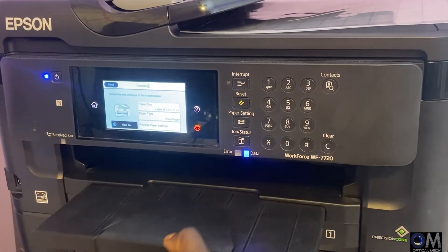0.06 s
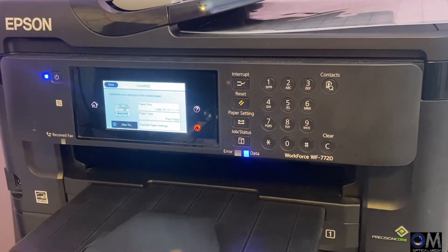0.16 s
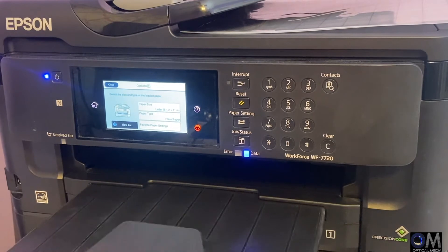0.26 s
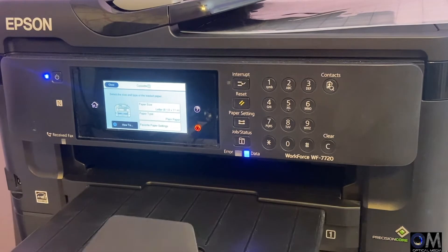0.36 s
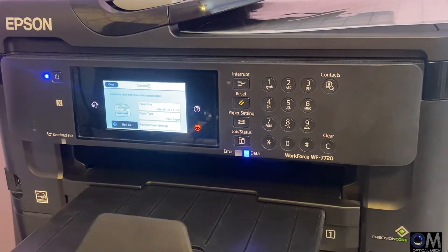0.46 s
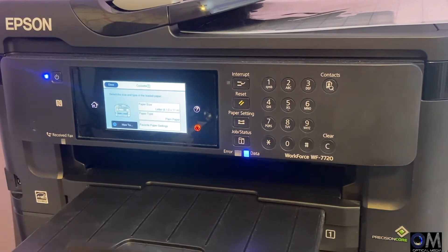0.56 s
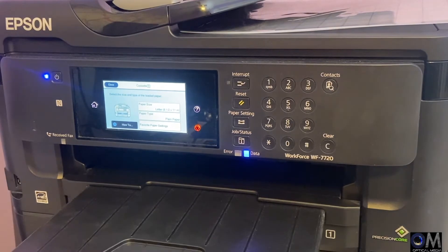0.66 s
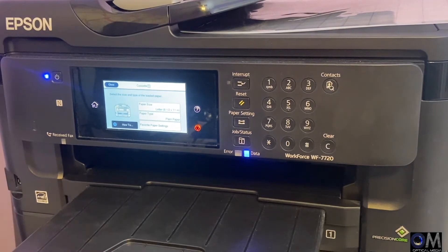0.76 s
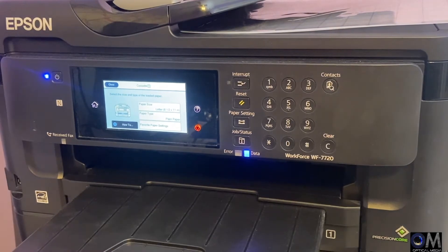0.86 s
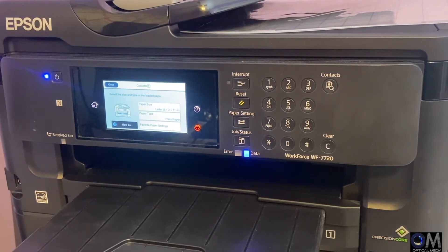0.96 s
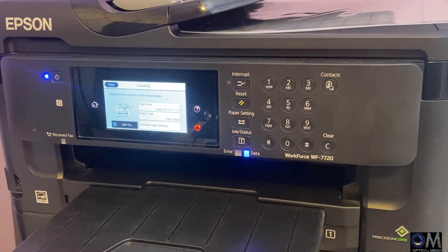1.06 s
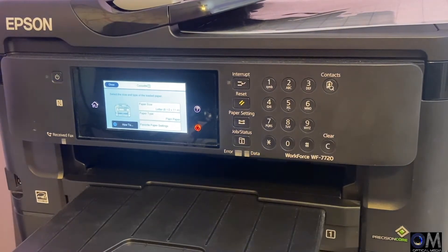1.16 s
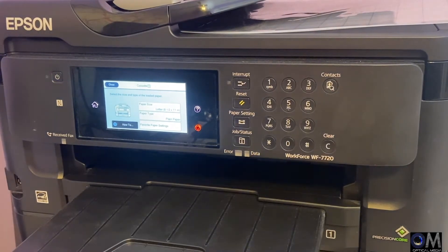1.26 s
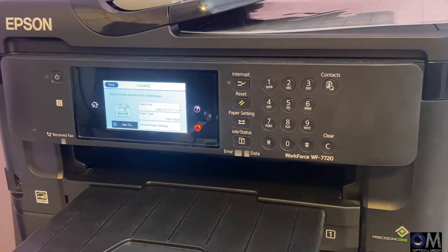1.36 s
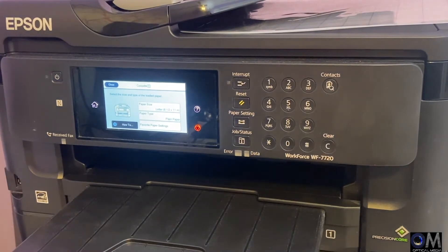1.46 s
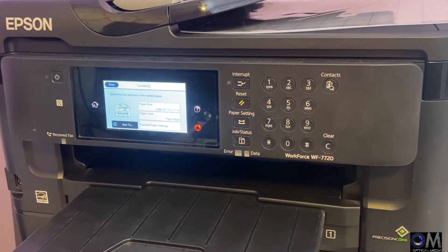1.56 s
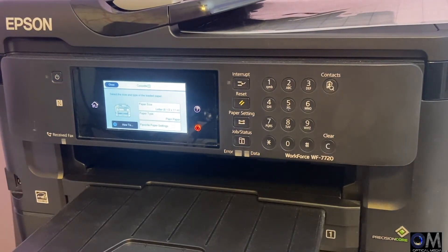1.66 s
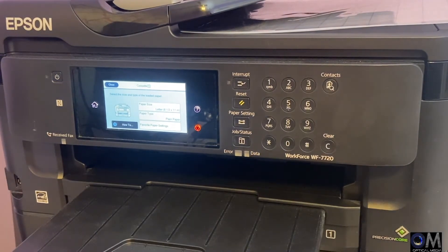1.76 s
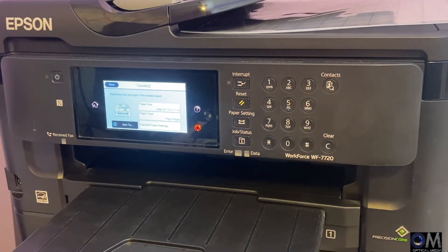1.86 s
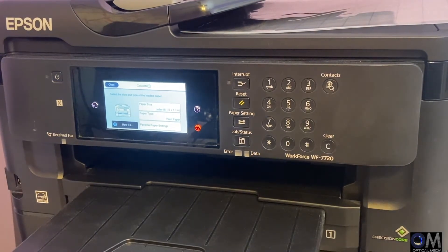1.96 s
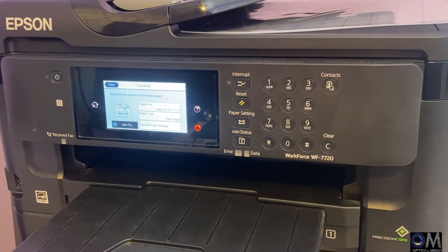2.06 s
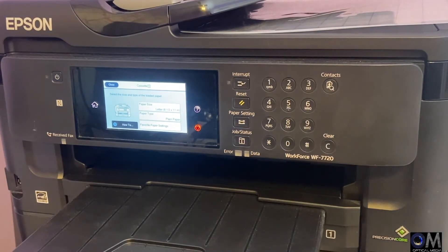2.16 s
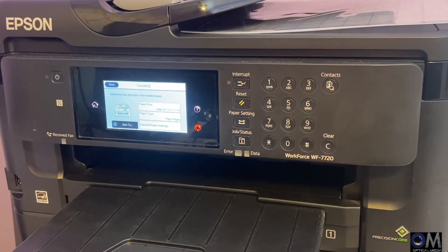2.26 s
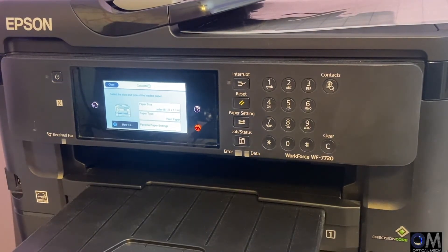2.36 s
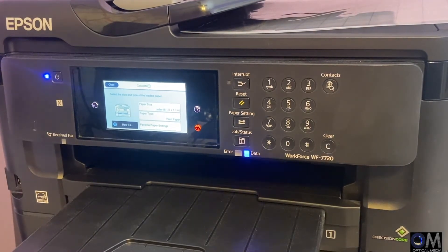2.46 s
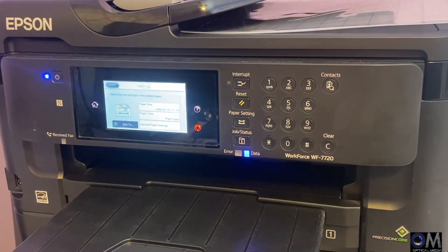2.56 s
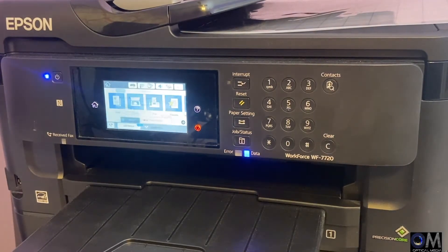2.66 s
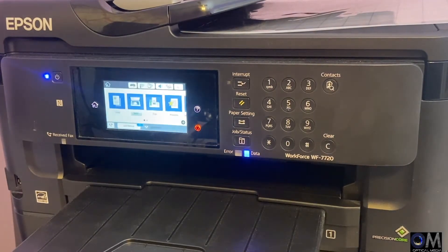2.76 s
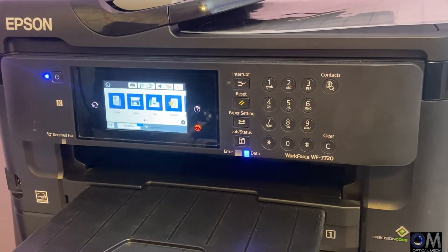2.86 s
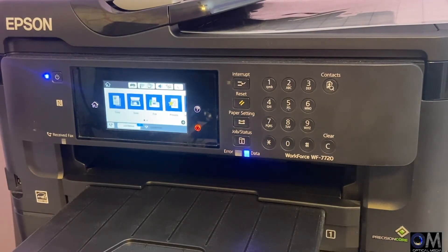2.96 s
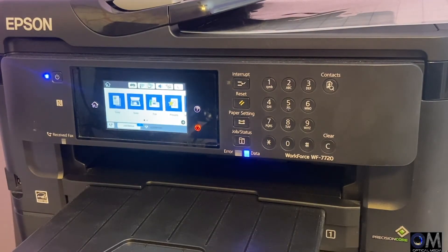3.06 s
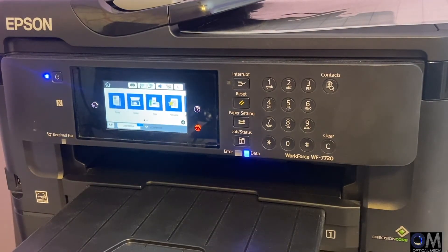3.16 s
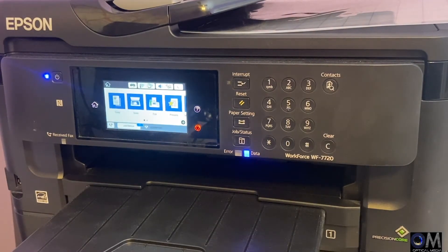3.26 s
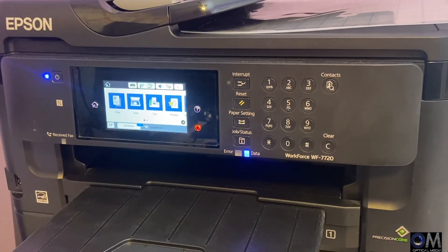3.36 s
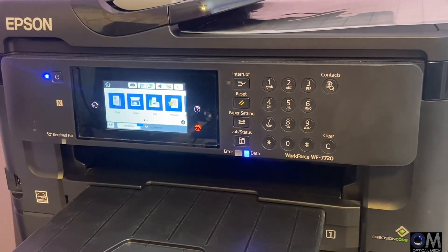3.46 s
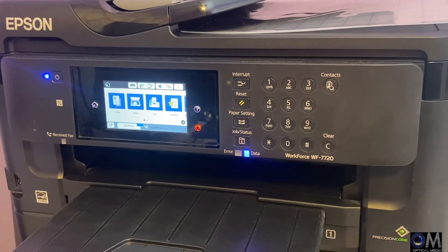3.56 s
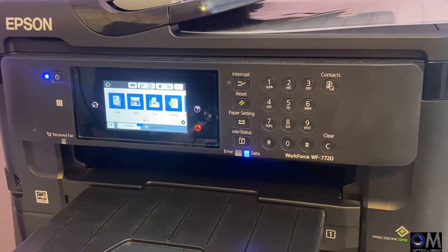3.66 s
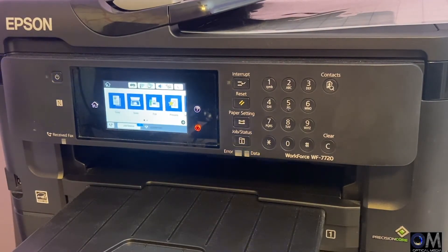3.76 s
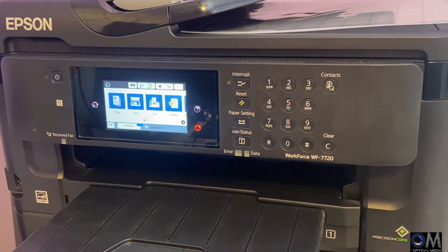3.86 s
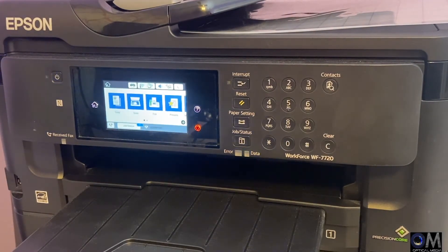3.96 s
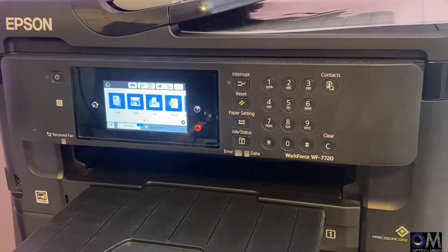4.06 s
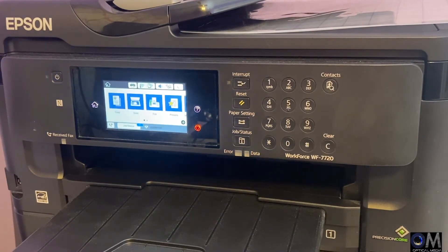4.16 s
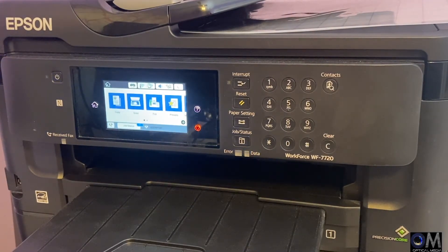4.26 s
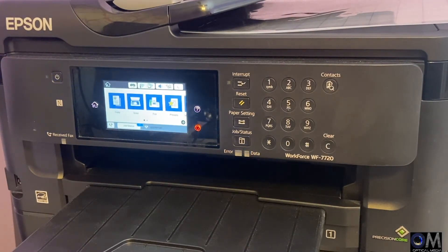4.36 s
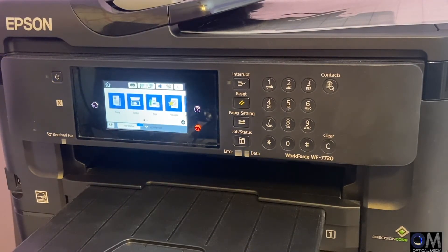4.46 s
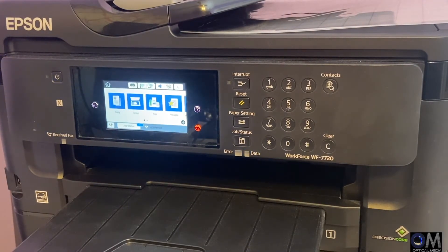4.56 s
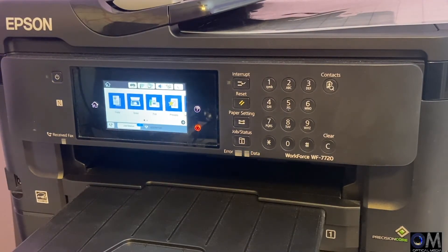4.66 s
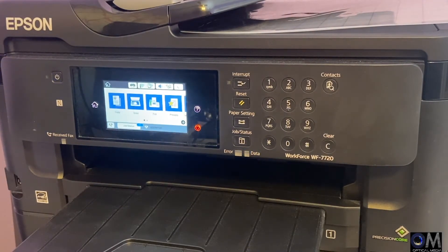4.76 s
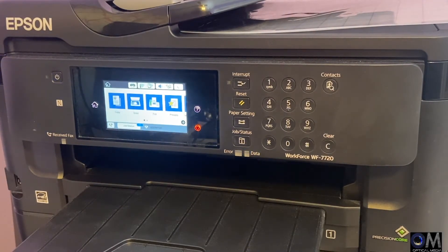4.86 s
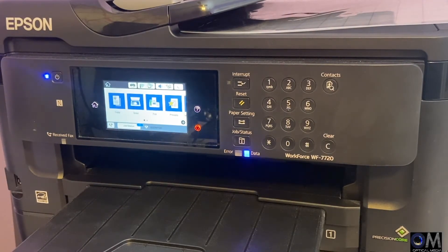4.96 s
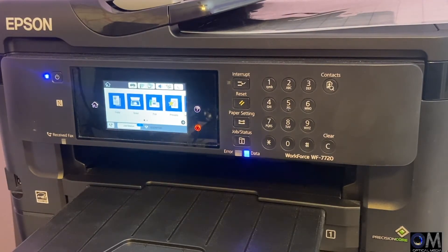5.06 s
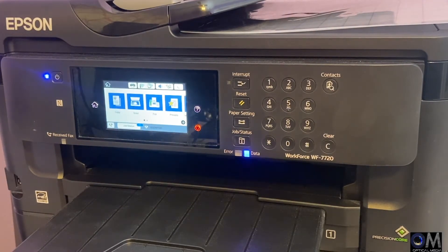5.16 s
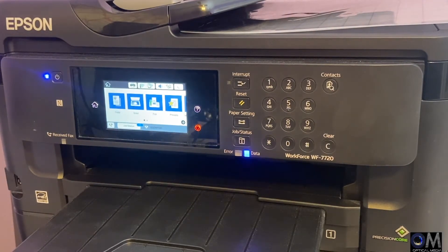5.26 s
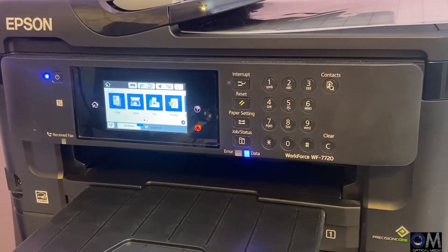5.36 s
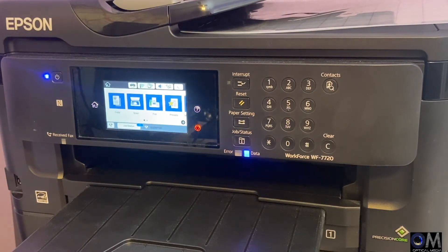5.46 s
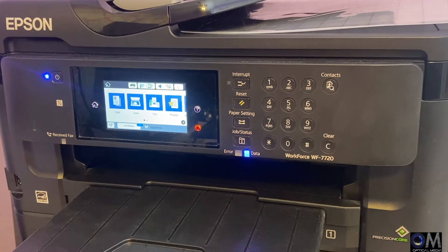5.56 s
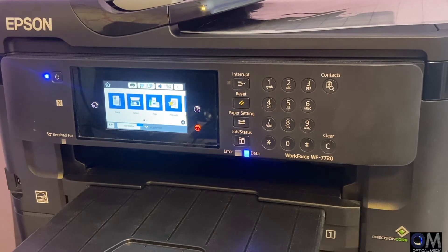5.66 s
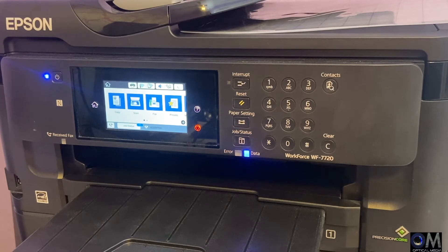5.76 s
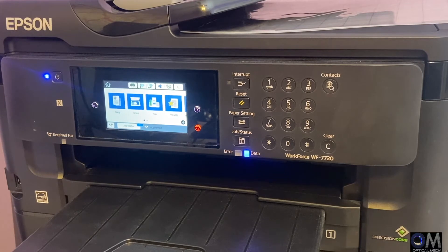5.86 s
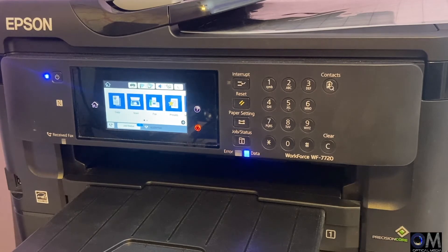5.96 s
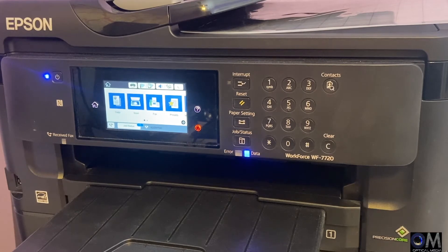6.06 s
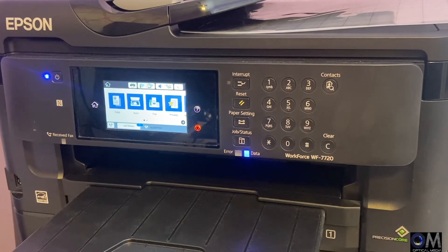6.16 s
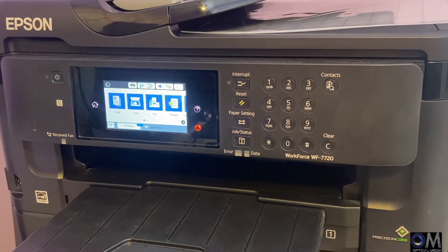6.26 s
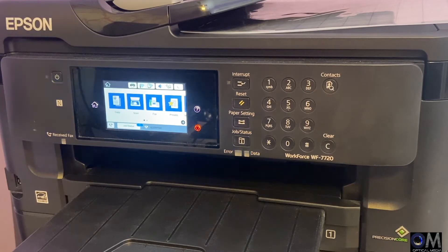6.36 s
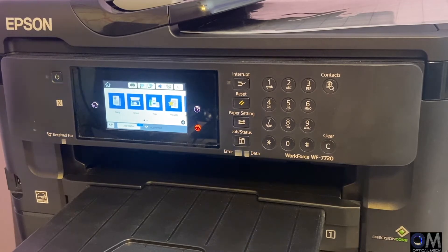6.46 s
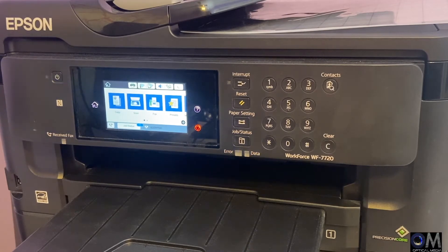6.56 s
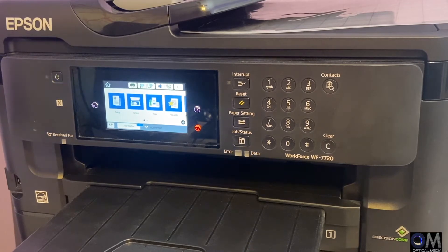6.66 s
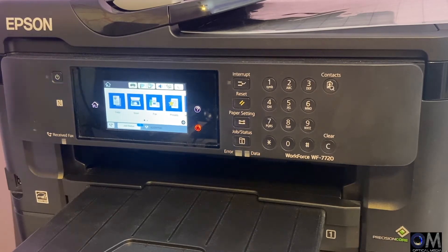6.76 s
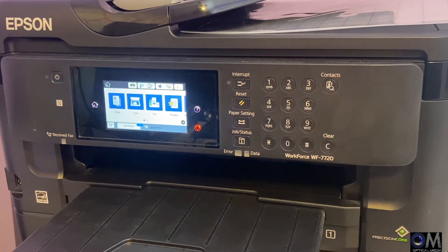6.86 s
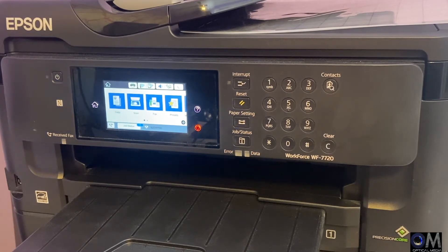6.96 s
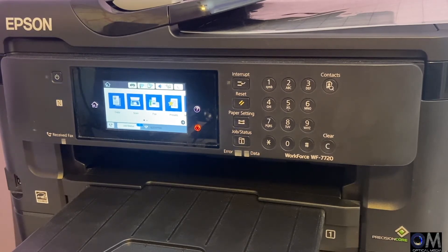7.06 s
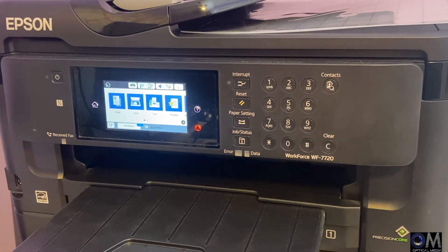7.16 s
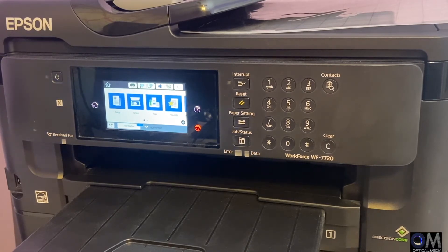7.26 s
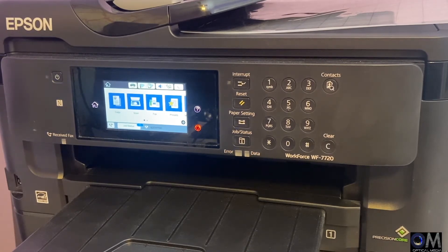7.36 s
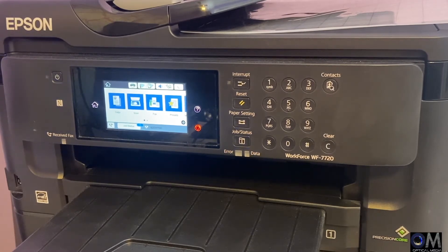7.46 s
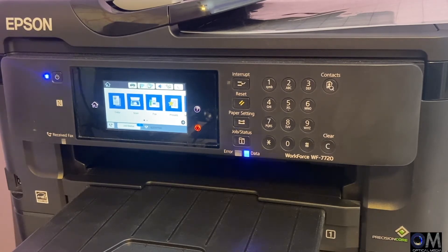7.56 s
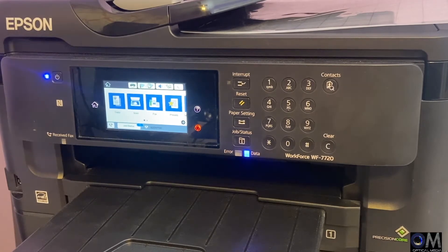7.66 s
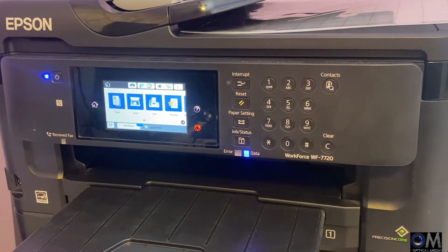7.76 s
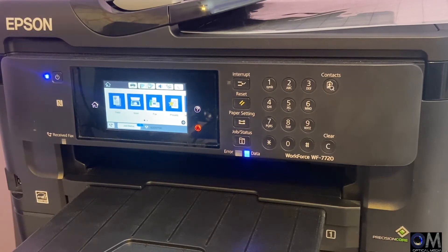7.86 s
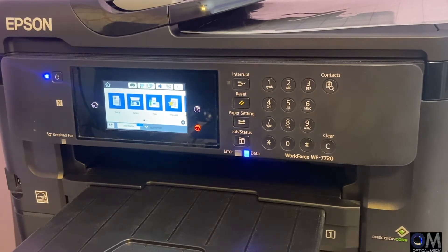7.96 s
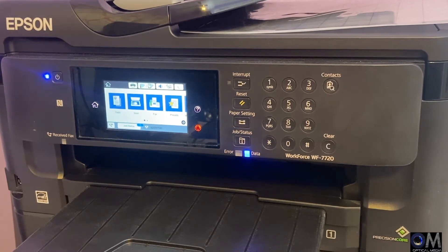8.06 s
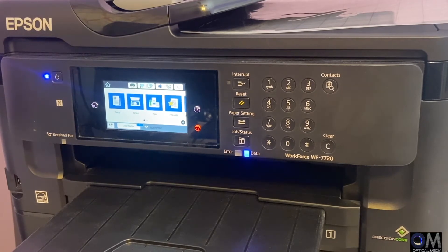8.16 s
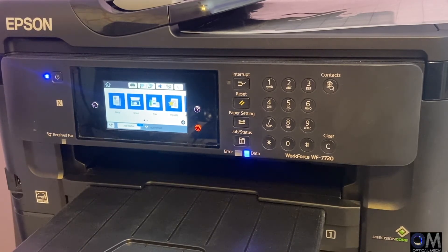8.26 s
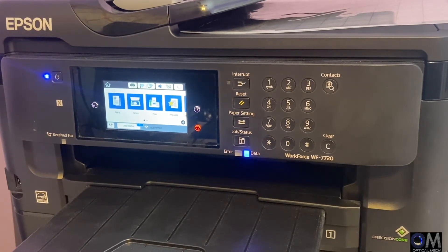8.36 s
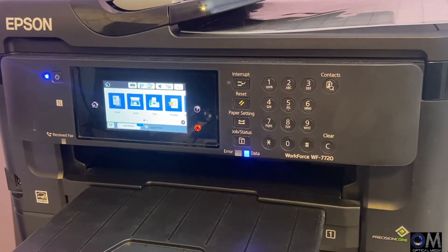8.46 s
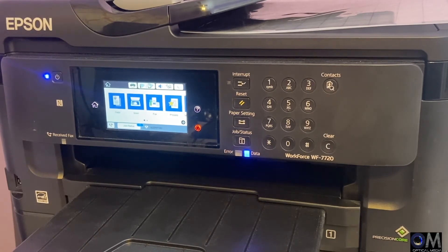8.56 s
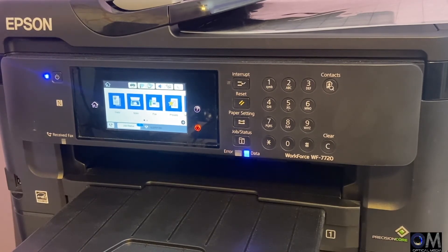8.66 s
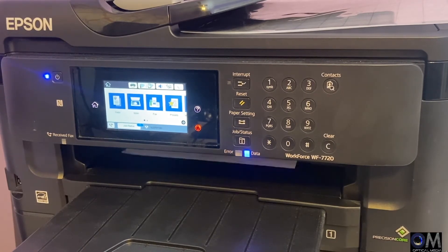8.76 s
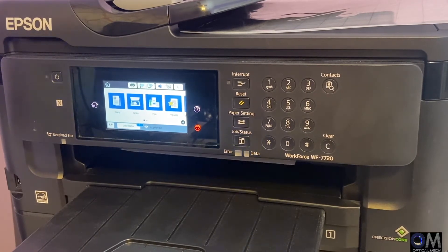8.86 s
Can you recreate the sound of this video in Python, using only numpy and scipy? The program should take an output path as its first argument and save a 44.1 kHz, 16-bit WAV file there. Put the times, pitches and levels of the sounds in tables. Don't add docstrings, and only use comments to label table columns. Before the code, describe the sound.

Plastic printer tray knocks, slides and bounces open, feed gears whir in bursts, a sheet clunks in, then the carriage shuttles rhythmically in a quiet room.

```python
import sys
import numpy as np
from scipy import signal
from scipy.fft import rfft, irfft
from scipy.io import wavfile

SR = 44100
rng = np.random.default_rng(int(sys.argv[2]) if len(sys.argv) > 2 else 0)


def attenuation_scalar(level_db):
    decades = np.asarray(level_db, float) / 20
    return 10 ** decades


def unload_audio(sound):
    columns = np.transpose(np.atleast_2d(sound))
    steps = np.round(np.clip(columns, -1, 1) * 32767)
    wavfile.write(sys.argv[1], SR, steps.astype(np.int16))


N = 393372
T = np.arange(N) / SR

CHASSIS_HZ = 131
# start_s, swish_db, chirp_db
STEPS = [(5.6638, -33.5, -45), (6.0177, -30.5, -42), (6.3417, -33, -50), (6.695, -30.5, -34),
         (7.016, -31, -36), (7.3494, -31.5, -33.5), (7.6839, -31, -36), (8.0157, -31.5, -37.5),
         (8.352, -31, -33.5), (8.682, -31.5, -36.5)]
# pitch_hz, density_db
SHAKE = [(25, -15), (60, -2), (130, -4), (200, -6.5), (320, -9.5), (600, -19), (1200, -48.5)]


def rms_one(x):
    return x / np.sqrt(np.mean(x ** 2) + 1e-20)


def at_hz(points, count):
    hz = np.maximum(np.arange(count // 2 + 1) * SR / count, 1)
    points = np.array(points)
    return np.interp(np.log(hz), np.log(points[:, 0]), points[:, 1])


def colour(x, spectrum):
    return rms_one(irfft(rfft(x) * attenuation_scalar(at_hz(spectrum, len(x))), len(x)))


def drift(rate):
    knots = rng.standard_normal(4000)
    return np.interp(T * rate, np.arange(len(knots)), knots)


def grit(rough_db, rate):
    return rng.standard_normal(N) * attenuation_scalar(rough_db * drift(rate))


def peak(x, hz, width):
    r = np.exp(-np.pi * width / SR)
    zeros = np.array([1, 0, -1]) * (1 - r * r) / 2
    poles = [1, -2 * r * np.cos(2 * np.pi * hz / SR), r * r]
    return signal.lfilter(zeros, poles, x)


def stack(hz, orders, flutter_db, wobble):
    turn = 2 * np.pi * np.cumsum(hz * (1 + wobble * drift(40))) / SR
    return sum(np.sqrt(2) * attenuation_scalar(db + flutter_db * drift(25)) * np.sin(k * turn) for k, db in orders)


def tones(lines, flutter_db):
    return sum(np.sqrt(2) * attenuation_scalar(db + flutter_db * drift(8.7)) * np.sin(2 * np.pi * hz * T) for hz, db in lines)


def stroke(start, stop, up, down):
    return -up * np.maximum(start - T, 0) - down * np.maximum(T - stop, 0)


def add(out, s, x):
    i = int(s * SR)
    out[i:i + len(x)] += x[:N - i]


def thump(db, rise_s, t60, shake, shake_db):
    t = T[:len(shake)]
    swing = (1 - np.exp(-t / rise_s)) * attenuation_scalar(-60 * t / t60)
    mode = np.sin(2 * np.pi * CHASSIS_HZ * t + rng.uniform(0, 6.8))
    return attenuation_scalar(db + 5.0) * swing * (mode + attenuation_scalar(shake_db) * shake)


def office():
    # pitch_hz, density_db
    air_spectrum = [(15, -22), (30, -4.5), (50, 12), (100, -2.5), (190, 1), (260, -11), (500, -14.5),
                    (680, -39.5), (3000, -46), (5000, -53), (8000, -57), (15800, -66.5)]
    # pitch_hz, level_db
    hum_lines = [(334.5, -62), (576, -77), (11800, -98), (12236, -98), (12651, -94), (13964, -94),
                 (15256, -96), (15692, -96)]
    flicker = attenuation_scalar(2.5 * drift(18))
    air = colour(rng.standard_normal(N), air_spectrum)
    return attenuation_scalar(-58.5) * flicker * air + tones(hum_lines, 2.0)


def gears():
    # pitch_hz, density_db
    rattle_spectrum = [(40, -23.5), (110, -7.5), (170, -8.5), (220, -12.5), (400, 2.5), (900, 0.5),
                       (1500, -3.5), (2200, -17), (3500, -44.5)]
    # pitch_hz, density_db
    hiss_spectrum = [(300, -32.5), (900, -4), (2000, 2.5), (3200, 0.5), (5000, -6), (8000, -7.5),
                     (11500, -8.5), (15800, -13)]
    # pitch_hz, width_hz, level_db
    gear_modes = [(172, 7.3, -9), (265, 89, -7.5), (418, 30, -11.5), (484, 20, -25.5), (830, 90, -13),
                  (1226, 12, -16)]
    # multiple, level_db
    whine_orders = [(1, 3), (3, -26)]
    # start_s, stop_s, rattle_db, whine_db
    feeds = [
        (2.99, 3.279, -38.5, -48.5),
        (3.367, 3.813, -39, -48.5),
        (4.541, 5.072, -37.5, -49),
        (5.114, 5.17, -40.5, -52),
        (5.238, 5.304, -36.5, -47.5),
    ]
    # start_s, stop_s, drone_db
    drone_runs = [(2.95, 3.137, -49), (3.24, 3.77, -40), (3.92, 4.056, -51.5), (4.72, 5.01, -40.5),
                  (5.11, 5.178, -39), (5.3, 5.396, -39)]
    # start_s, stop_s, rattle_db, hiss_db
    slides = [(-.02, -0.0176, -35.5, -48.5), (0.094, 0.0954, -45.5, -56.5), (0, 0.21, -50, -49),
              (.825, 0.98, -76.5, -69.5), (1.448, 1.4, -61, -88), (1.516, 1.53, -49, -85),
              (4.5, 4.5, -49, -52),
              (1.048, 1.066, -51, -58),
        (3.765, 3.83, -48, -45),
    ]
    # start_s, rattle_db, dying_db_per_s, drone_db
    creaks = [(0.241, -49.5, 34, -43), (.62, -75, 31, -52.5), (1.08, -64, 37, -56),
              (1.6, -77.5, 0.5, -69.5), (2.7, -69, 5, -61), (3.88, -66, 19, -51)]
    feed_up, feed_down = 910, 276
    whine_hz, whine_lag_s, whine_edge = 1605, 0.046, 1100

    teeth = grit(rough_db=0.5, rate=300)
    modes = sum(attenuation_scalar(db) * rms_one(peak(teeth, hz, width)) for hz, width, db in gear_modes)
    body = rms_one(colour(teeth, rattle_spectrum) + modes)
    hiss = attenuation_scalar(1.0) * colour(grit(rough_db=1.0, rate=180), hiss_spectrum)
    locked = stack(CHASSIS_HZ, [(0.99, 0.011)], flutter_db=-1.5, wobble=.03)
    drone = attenuation_scalar(-2.5) * rms_one(locked + 0.26 * rms_one(peak(teeth, CHASSIS_HZ, 30)))
    whine = stack(whine_hz, whine_orders, flutter_db=3.5, wobble=0.0019)

    rattles = hisses = whines = 0
    drones = sum(attenuation_scalar(db + stroke(start, stop, 290, 270)) for start, stop, db in drone_runs)
    for start, stop, db, whine_db in feeds:
        speed = stroke(start, stop, feed_up, feed_down)
        rattles += attenuation_scalar(db + speed)
        hisses += attenuation_scalar(db - 6 + 1.07 * speed)
        sing_from = min(start + whine_lag_s, stop)
        whines += attenuation_scalar(whine_db + stroke(sing_from, stop, whine_edge, whine_edge))
    for start, stop, db, hiss_db in slides:
        push = attenuation_scalar(stroke(start, stop, 350, 410))
        rattles += attenuation_scalar(db) * push
        hisses += attenuation_scalar(hiss_db) * push
        drones += attenuation_scalar(db - 11) * push
    for s, db, dying, drone_db in creaks:
        left = attenuation_scalar(stroke(s, s, feed_up, dying)) * (T < s + 1.2)
        rattles += attenuation_scalar(db) * left
        hisses += attenuation_scalar(db - 5) * left
        drones += attenuation_scalar(drone_db) * left
    return rattles * body + hisses * hiss + drones * drone + whines * whine


def idle():
    # start_s, stop_s, level_db
    squeaks = [
        (2.249, 2.367, -69),
    ]
    # start_s, stop_s, level_db
    sizzles = [
        (2.204, 2.69, -81.5),
        (3.98, 4.45, -83),
    ]
    # start_s, stop_s, level_db
    sings = [(0, 0.964, -73), (2.85, 2.951, -77), (3.95, 4.447, -75), (6.33, 6.45, -67)]
    edge = 500
    white = rng.standard_normal(N)
    squeak = rms_one(peak(white, 3520, 150) + peak(white, 3930, 110) + .6 * peak(white, 3250, 200))
    sizzle = rms_one(peak(peak(white, 7040, 700), 5900, 900))
    sing = tones([(12660, 0.0)], 3.0)
    return (squeak * sum(attenuation_scalar(db + stroke(start, stop, edge, 75)) for start, stop, db in squeaks)
            + sizzle * sum(attenuation_scalar(db + stroke(start, stop, edge, edge)) for start, stop, db in sizzles)
            + sing * sum(attenuation_scalar(db + stroke(start, stop, edge, edge)) for start, stop, db in sings))


def knocks():
    # pitch_hz, density_db
    knock_spectrum = [(100, -26), (400, -12.5), (700, 3), (1000, 3.5), (1800, -9), (3000, -16.5),
                      (6000, -52)]
    # pitch_hz, density_db
    case_spectrum = [(60, -18.5), (150, 3), (280, -5), (420, 1.5), (600, -4), (1000, -48.5)]
    # pitch_hz, density_db
    gear_spectrum = [(500, -43), (1500, -9), (2800, -1), (5000, -11.5), (8000, -13), (15800, -21)]
    # pitch_hz, density_db
    tray_spectrum = [(500, -30), (1500, -6), (3200, 0), (5000, -8.5), (8000, -12.5), (15800, -25.5)]
    # start_s, peak_db, ring_hz, crack_db, case_db
    tray_knocks = [(.237, -28, 3370, -19, -41), (.246, -12.5, 4870, -13.5, -27),
                   (.25, -10.5, 1180, -28, -37), (.262, -32, 1170, -24, -23.5),
                   (.285, -29.5, 885, -50, -39), (.347, -16, 3050, -30, -45),
                   (.363, -24, 4350, -45.5, -39.5), (.384, -30, 3550, -40, -55),
                   (.463, -24.5, 4060, -35, -42), (.474, -37, 3460, -48, -48),
                   (.492, -39, 3460, -45.5, -45), (.503, -28, 3460, -40, -40.5), (.52, -44, 3370, -41, -53),
                   (.6, -24, 900, -35, -35), (.604, -14, 910, -23.5, -27), (.62, -14, 880, -23.5, -38),
                   (.654, -36, 1000, -48, -40), (.661, -21.5, 1000, -35, -29.5),
                   (.677, -21.5, 3600, -25.5, -33.5), (.848, -46.5, 4390, -51, -47),
                   (.985, -31, 2350, -49, -39), (.988, -29, 790, -44.5, -31), (.989, -33, 2980, -57, -45),
                   (1.056, -34, 3300, -47, -39.5), (1.066, -26, 1000, -64, -40),
                   (1.072, -21, 990, -66, -47), (1.074, -34, 1480, -68, -53), (1.085, -40, 1095, -72, -52),
                   (1.414, -34.5, 664, -44.5, -72), (1.813, -46, 693, -84.5, -54.5)]
    # start_s, peak_db,
    # ring_hz, crack_db, case_db
    latches = [(2.193, -56.5, 660, -73, -58), (2.236, -57.5, 3550, -67, -53.5),
               (2.417, -51, 5490, -70, -72.5), (2.508, -60.5, 656, -65.5, -63.5),
               (2.615, -53, 1394, -64.5, -56.5), (2.694, -41, 900, -57, -44.5),
               (2.7, -28.5, 993, -44, -29.5), (2.706, -28.5, 850, -42, -48), (2.766, -32, 853, -75.5, -49),
               (2.899, -41, 2740, -43.5, -48), (2.905, -33, 2740, -38, -43),
               (2.915, -31.5, 960, -33.5, -51.5), (2.978, -26, 1044, -35, -61),
               (4.015, -33.5, 793, -83, -38), (4.029, -48, 3750, -54, -60), (4.073, -34.5, 1000, -81, -37),
               (4.179, -30, 870, -84, -37.5), (4.279, -43, 956, -64, -52), (4.369, -49, 1076, -58, -63),
               (4.415, -57, 1300, -78, -65), (4.451, -30, 953, -37.5, -36.5), (6.023, -48, 1000, -34, -49),
               (6.362, -36, 1000, -36.5, -51)]
    # start_s, peak_db, ring_hz, crack_db, case_db
    pickup = [(4.506, -24, 950, -28, -23.5), (4.525, -14, 1000, -48, -44), (4.533, -4, 2110, -41, -36),
              (4.779, -17, 1430, -22.5, -49), (4.868, -16, 1290, -26, -35), (4.994, -37, 875, -27, -58),
              (5.028, -25, 1610, -32, -49), (5.077, -15, 1200, -28.5, -43),
              (5.131, -20.5, 2200, -31.5, -38), (5.158, -24, 745, -40, -29), (5.211, -29, 1020, -32.5, -43)]
    # start_s, level_db, t60_s
    thumps = [(0.253, -36, 0.41), (0.618, -58, 0.22), (1.068, -29, 0.27), (1.17, -49, 0.42),
              (1.245, -52, 0.28), (2.706, -49.5, 0.63), (2.91, -42, 0.23), (3.901, -43.5, 0.32),
              (4.08, -49.5, 0.67), (4.291, -44, 0.25), (4.531, -23.5, 0.14), (5.079, -36, .2),
              (5.338, -33.5, 0.17)]

    out, t = np.zeros(N), T[:SR // 3]
    grains = grit(rough_db=-1.0, rate=660)
    rustle, case, shake = (colour(grains, c) for c in (knock_spectrum, case_spectrum, SHAKE))
    gear_crack, tray_crack = (colour(grains, c) for c in (gear_spectrum, tray_spectrum))
    families = ((tray_knocks, 0.084, 0.0012, tray_crack),
                (latches, .11, 0.0015, gear_crack),
                (pickup, 0.089, 0.0011, gear_crack))
    for rows, t60, rise, crack in families:
        snap = attenuation_scalar(2 - 60 * t / .018)
        decay = snap + attenuation_scalar(-3.0 - 60 * t / t60) + attenuation_scalar(-22.5 - 20 * t / t60)
        fade = decay * (1 - np.exp(-t / rise)) ** 2
        boom = attenuation_scalar(-40 * t / t60) * (1 - np.exp(-t / .005))
        for s, db, hz, crack_db, case_db in rows:
            i = int(s * SR)
            part = slice(i, i + len(t))
            width = 280 + .03 * hz
            ring = peak(grains[part] * fade, hz, width) / np.sqrt(width / SR) * (hz / 1500) ** .3
            add(out, s, attenuation_scalar(db - 16.5) * fade * rustle[part] + attenuation_scalar(db - 20.5) * ring)
            add(out, s, attenuation_scalar(crack_db - 5) * fade * crack[part])
            add(out, s, attenuation_scalar(case_db - 5.5) * boom * case[part])
    for s, db, t60 in thumps:
        add(out, s, thump(db, 0.017, t60, shake[int(s * SR):][:len(t)], shake_db=-8.0))
    return out


def tab():
    # pitch_hz, level_db, t60_s
    tab_modes = [(2315, -18, .08), (3030, -2, 0.079), (3182, -4.5, 0.13), (3400, -2.5, 0.13),
                 (3860, -3.5, 0.047), (3940, -9, 0.13), (4090, -8.5, .12), (4242, -6.5, 0.077),
                 (4620, -5, 0.041), (6500, -24, .1)]
    # start_s, level_db
    tab_hits = [(.347, -34), (.3625, -33), (.366, -38), (.385, -43), (.4637, -42.5), (.476, -43),
                (.492, -44), (.5036, -41), (.515, -47), (0.6036, -31.5), (.621, -44), (0.677, -39.5)]
    s, db = np.transpose(tab_hits)
    luck, out = rng.standard_normal((len(s), len(tab_modes))), np.zeros(N)
    for k, (hz, level_db, t60) in enumerate(tab_modes):
        clicks = np.full(SR, 1e-18)
        clicks[(s * SR).astype(int)] = attenuation_scalar(db + level_db + 3.5 * luck[:, k])
        r, w = attenuation_scalar(-60 / (t60 * SR)), 2 * np.pi * hz / SR
        add(out, 0, signal.lfilter([0, np.sin(w)], [1, -2 * r * np.cos(w), r * r], clicks))
    return out


def scrape():
    # start_s, pitch_hz, level_db
    glide = [
        (1.41, 812, -58),
        (1.45, 954, -45.5),
        (1.52, 1146, -48.5),
        (1.56, 1120, -56),
        (1.6, 1020, -67),
    ]
    s, hz, db = np.transpose(glide)
    inside = np.clip(np.minimum(T - s[0], s[-1] - T) / 0.017 + 1, 0, 1)
    flutter = signal.lfilter([1], [1, -.98], rng.standard_normal(N))
    tone = np.sin(2 * np.pi * np.cumsum(np.interp(T, s, hz)) / SR)
    return inside * attenuation_scalar(np.interp(T, s, db)) * rms_one(flutter) * tone


def carriage():
    # pitch_hz, density_db
    rail_spectrum = [(100, 21), (300, 9), (700, 7.5), (1500, 3.5), (3200, -1), (6000, -3.5), (10000, -2),
                     (14000, -7.5), (15800, 0.5)]
    # multiple, level_db
    motor_orders = [(1, 0), (2, -13), (4, -15), (5, -18)]
    # multiple of the motor, level_db re belt
    belt_orders = [(2.94, -9)]
    # pitch_hz, width_hz, level_db
    belt_modes = [(813, 130, -12), (1600, 100, -15), (2410, 120, -20), (3140, 150, -17), (4000, 110, -22)]
    # pitch_hz, level_db
    driver_lines = [(13560, -80), (13720, -78), (13900, -80)]
    print_s, motor_hz = 5.36, 263.8

    turns = np.array([print_s - .04] + [row[0] for row in STEPS])
    lap = np.maximum(np.searchsorted(turns, T) - 1, 0)
    since = T - turns[lap]
    growing = np.clip(since, 0, .4)

    start_up = stroke(turns[2], turns[2], 17, 0)
    easing = -0.5 * np.exp(-(since / 0.03) ** 2)
    motor_db = -59 + start_up + easing + 2.2 * drift(8)
    motor = attenuation_scalar(motor_db) * stack(motor_hz, motor_orders, flutter_db=1.5, wobble=.003)

    first_slip_s = np.array((0.12, 0.14))[lap % 2]
    slip = ((since - first_slip_s) / 0.075 + 0.084 * drift(9.1)) % 1
    belt_hz = 770 + 115 * np.sin(.9 * np.pi * slip) + 22 * drift(70)
    warble = np.sin(2 * np.pi * np.cumsum(belt_hz) / SR)
    belt = rms_one(warble * attenuation_scalar(3.9 * drift(46)) * np.abs(np.sin(np.pi * slip)) ** 0.56)
    teeth = rng.standard_normal(N)
    for hz, width, db in belt_modes:
        belt += attenuation_scalar(db + 2.2 * drift(12)) * rms_one(peak(peak(teeth, hz, width), hz, width))
    belt += stack(motor_hz, belt_orders, flutter_db=2.5, wobble=.015)
    moving = np.clip((since - .12) / .03, 0, 1) * np.clip((.32 - since) / .03, 0, 1)
    belt *= 1 - .85 * (1 - moving)
    belt *= attenuation_scalar(-56.5 + 12.8 * growing)

    rail = attenuation_scalar(-59 + 2.8 * growing + 4.0) * colour(grit(rough_db=1.5, rate=75), rail_spectrum)
    sway = attenuation_scalar(-55.5 + 1.7 * drift(41)) * rms_one(peak(rng.standard_normal(N), CHASSIS_HZ, 13.0))
    running = attenuation_scalar(stroke(print_s, print_s, 830, 0))
    return running * (motor + belt + rail + sway + tones(driver_lines, 10.0))


def paper_steps():
    # pitch_hz, density_db
    paper_spectrum = [(100, -13), (400, 3), (650, -1), (1000, 2.5), (2000, -7.5), (3800, -10),
                      (6000, -21.5), (9000, -27.5)]
    # pitch_hz, density_db
    rasp_spectrum = [(2500, -55), (6000, 7.5), (10000, 10), (13000, 3.5), (15800, -30)]
    top_hz, spin_up_s = 1200, 0.052
    out, t = np.zeros(N), T[:SR // 4]
    grains, wobble = grit(rough_db=2.5, rate=310), drift(200)
    swish, rasp, shake = (colour(grains, c) for c in (paper_spectrum, rasp_spectrum, SHAKE))

    u = (t + 1e-4) / spin_up_s
    rising = u ** 2.47 * np.exp(3.08 * (1 - u)) * (u < 1)
    falling = attenuation_scalar(-20 * np.abs(u - 1) ** 1.56) * (u >= 1)
    speed = rising + falling
    arc = np.clip((t - .018) / (0.7 * spin_up_s), 0, 1)
    chirp_shape = np.abs(np.sin(np.pi * arc)) ** 0.19 * attenuation_scalar(-4.0 * arc ** 2)
    for s, db, chirp_db in STEPS:
        i = int((s - .1) * SR)
        part = slice(i, i + len(t))
        rasp_gain = attenuation_scalar(-6 + 4.0 * (db + 31.0))
        paper = speed * swish[part] + rasp_gain * speed ** 3.4 * rasp[part]
        add(out, s - 0.029, attenuation_scalar(db - 7.5) * paper)

        hz = top_hz * (1 - 0.9 * (arc - .52) ** 2) * (1 + 0.04 * wobble[part])
        turn = 2 * np.pi * np.cumsum(hz) / SR
        tone = np.sin(turn) + attenuation_scalar(-23.0) * np.sin(3 * turn)
        add(out, s - .024, attenuation_scalar(chirp_db + 2.0) * chirp_shape * tone)

        frame = rms_one(peak(grains[part], top_hz, 60))
        add(out, s + 0.027, attenuation_scalar(chirp_db - 23 - 60 * t / 0.46) * frame)
        add(out, s + .04, thump(-38, .025, 0.29, shake[part], shake_db=0.5))
    return out


def echoes(x, t60):
    t = T[:SR // 2]
    tail = rng.standard_normal(len(t)) * attenuation_scalar(-60 * t / t60)
    return signal.fftconvolve(x, tail / np.sqrt(np.sum(tail ** 2)))[:N]


def scene():
    # pitch_hz, side_db re mid
    side_width = [(60, -22), (140, -22), (330, -10), (770, -12), (1300, -10), (1800, -12), (2400, -22),
                  (3300, -35), (6000, -50)]
    printer = gears() + idle() + knocks() + tab() + scrape() + carriage() + paper_steps()
    duller = signal.sosfilt(signal.butter(1, [220, 3500], "band", fs=SR, output="sos"), printer)
    mid = printer + attenuation_scalar(-8) * echoes(duller, 0.24) + office()
    shifting = sum(drift(18) * echoes(mid, 0.066) for _ in range(3)) * attenuation_scalar(1.4)
    side = irfft(rfft(shifting) * attenuation_scalar(at_hz(side_width, N)), N)
    return np.array([mid + side, mid - side])


def top_cut(x):
    return signal.sosfilt(signal.butter(12, 16960, fs=SR, output="sos"), x)


def record(dry):
    # pitch_hz, left_minus_right_db
    left_levels = [(60, 0), (120, -2.5), (230, -2), (330, .5), (1000, .5), (2500, 0)]
    # pitch_hz, lead_rad
    port_phases = [(20, 0), (7200, 0), (8500, 2.9), (9500, 3.4), (10600, 6.0), (11600, 6.5), (12800, 9.2),
                   (13600, 9.6), (14600, 12.4), (17000, 12.6)]
    tilt = attenuation_scalar(at_hz(left_levels, N) / 2) * np.exp(-.5j * at_hz(port_phases, N))
    ports = irfft(rfft(dry) * np.array([tilt, 1 / tilt]), N)
    ports = signal.sosfilt(signal.cheby2(16, 60, 15980, fs=SR, output="sos"), ports)
    ports = signal.sosfilt(signal.butter(2, 38, "high", fs=SR, output="sos"), ports)
    return top_cut(ports)


dry = scene()
out = record(dry)
unload_audio(out)
```